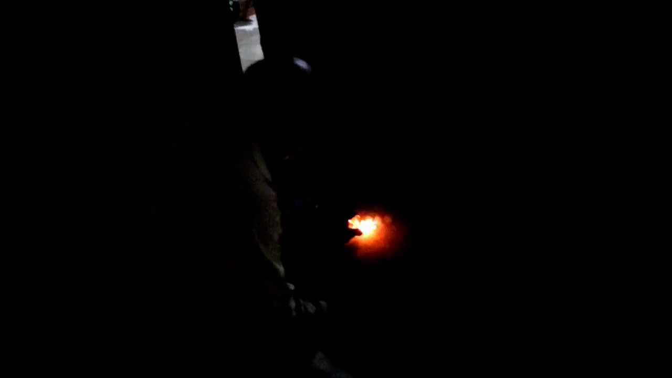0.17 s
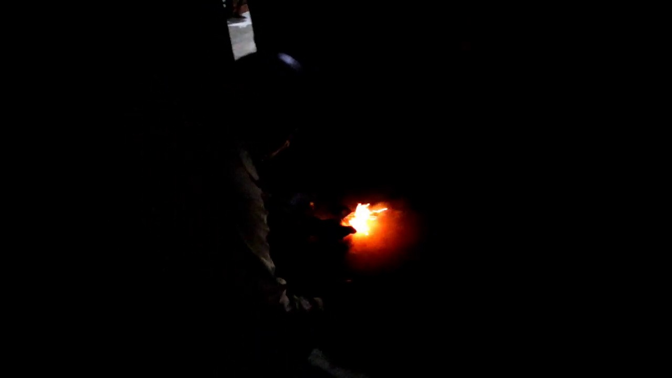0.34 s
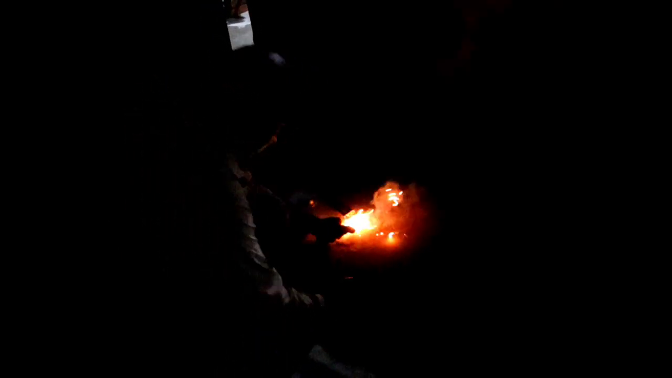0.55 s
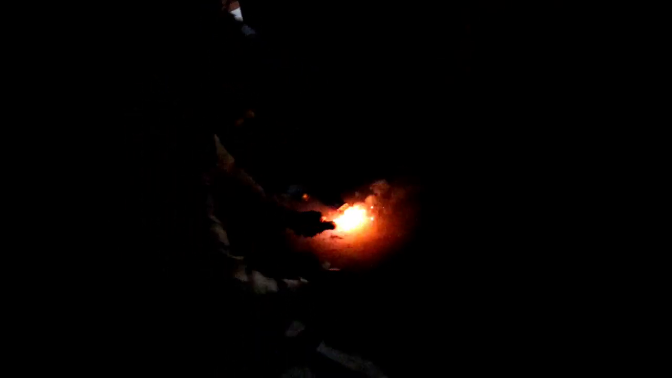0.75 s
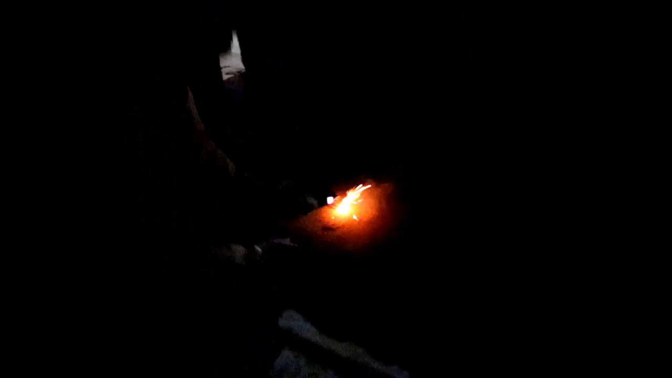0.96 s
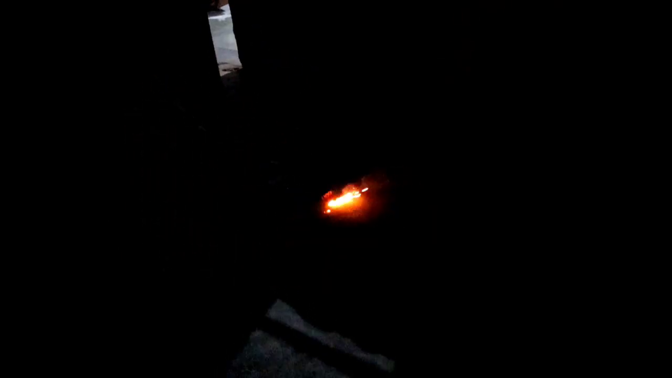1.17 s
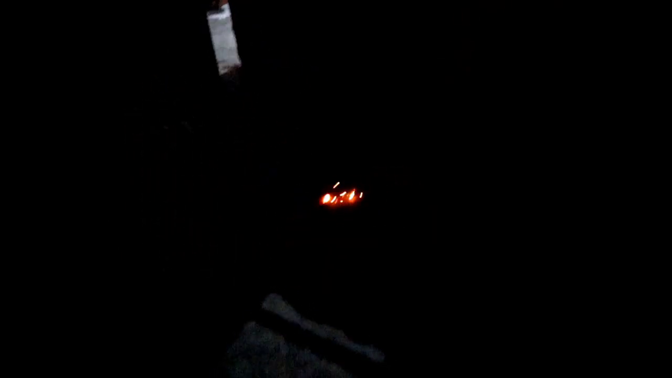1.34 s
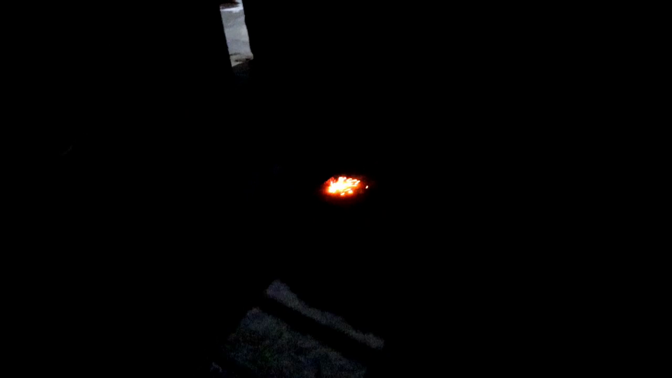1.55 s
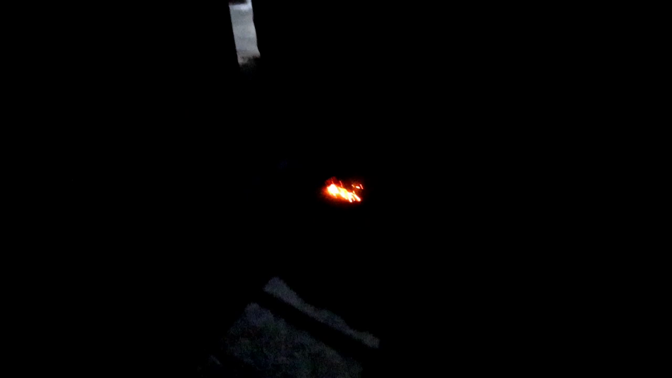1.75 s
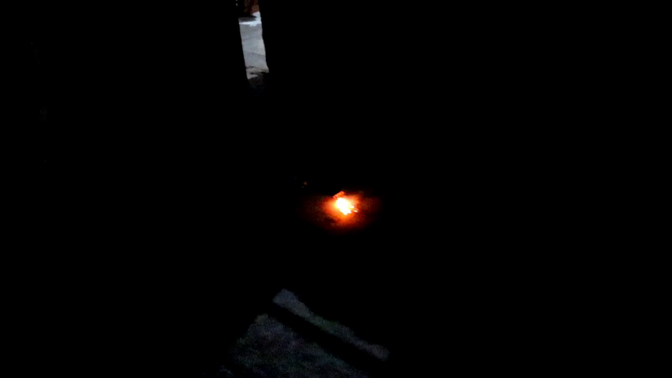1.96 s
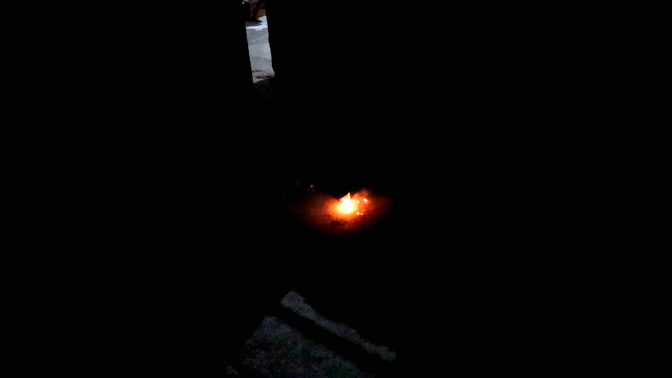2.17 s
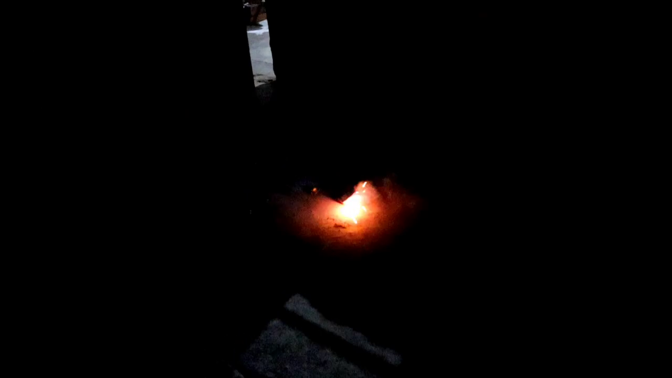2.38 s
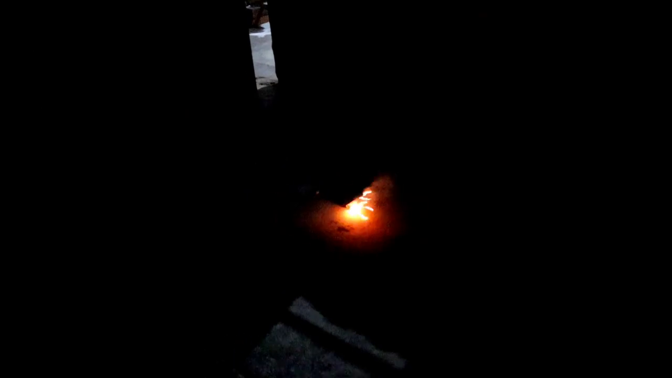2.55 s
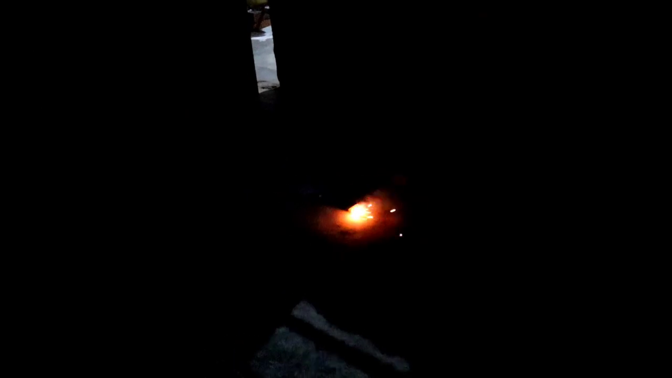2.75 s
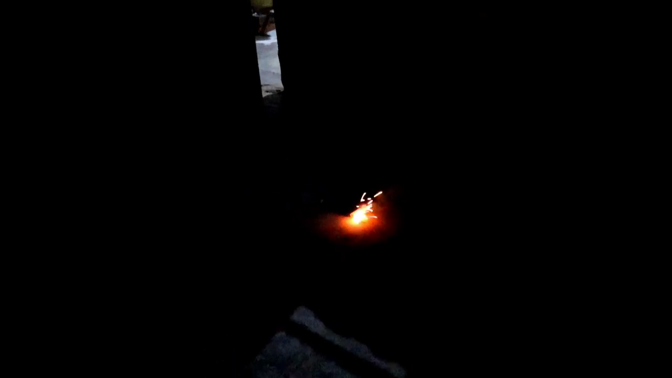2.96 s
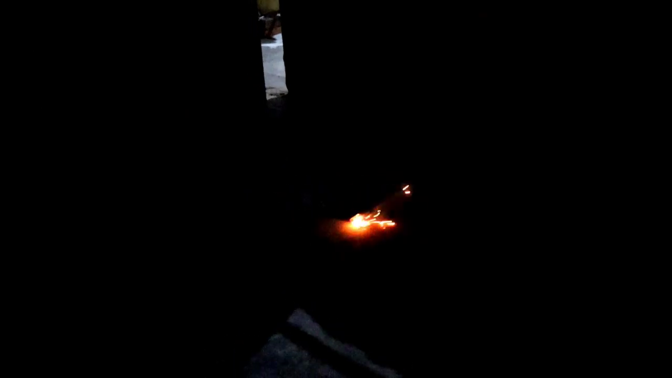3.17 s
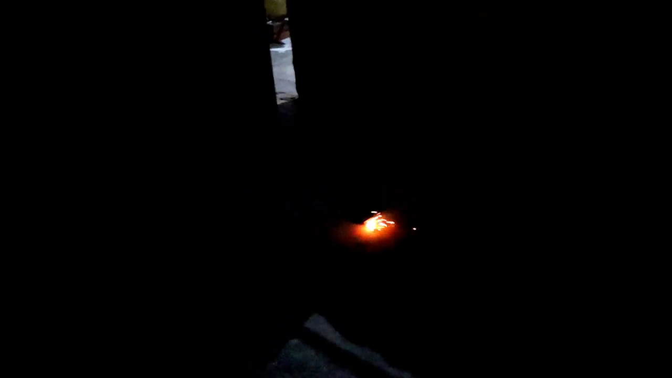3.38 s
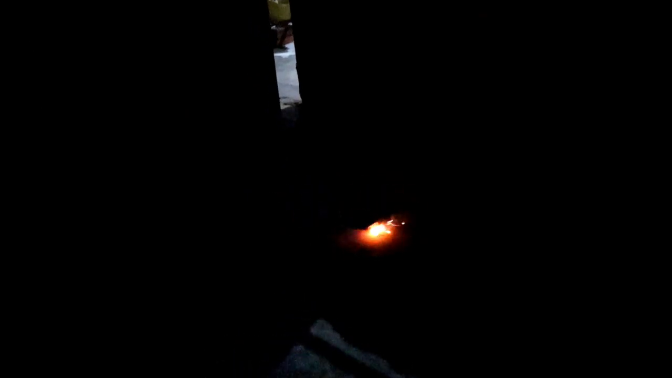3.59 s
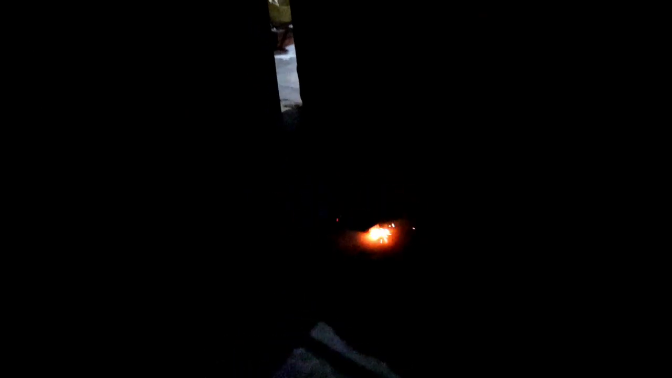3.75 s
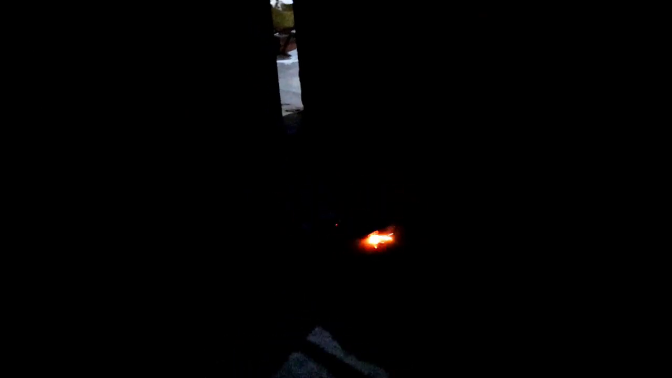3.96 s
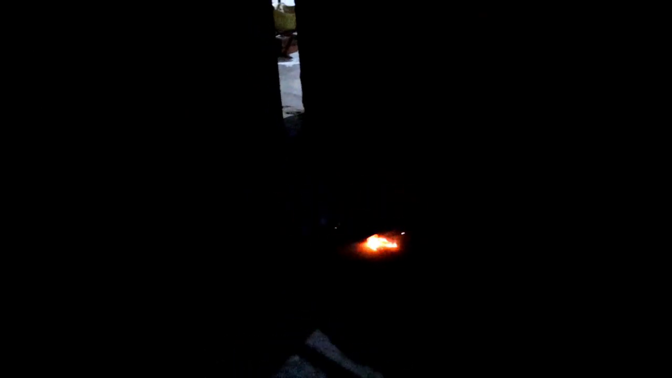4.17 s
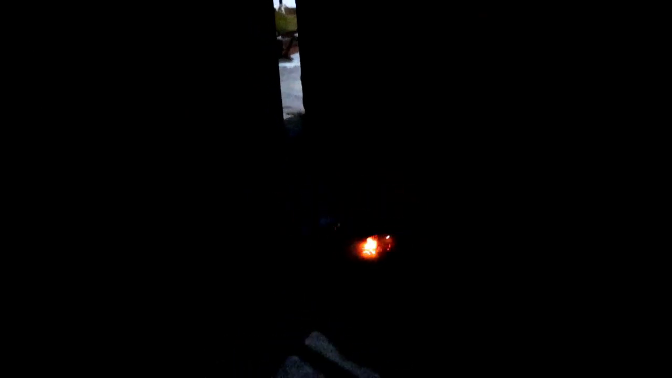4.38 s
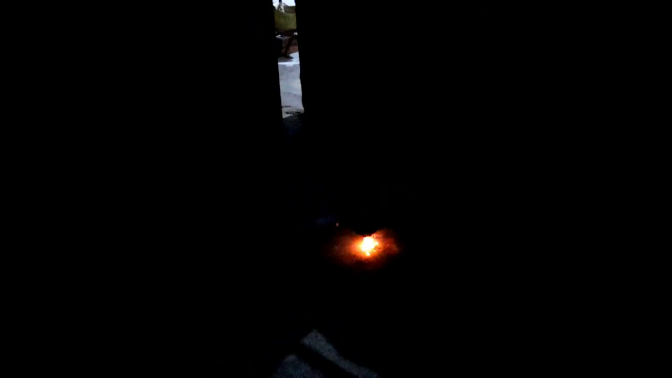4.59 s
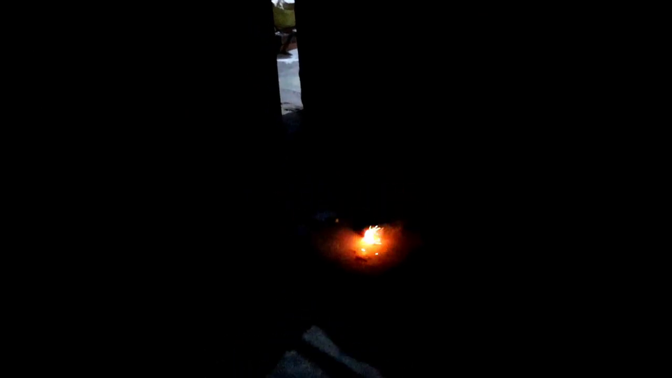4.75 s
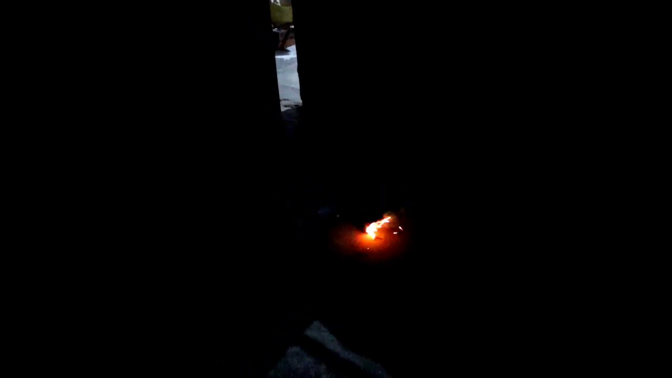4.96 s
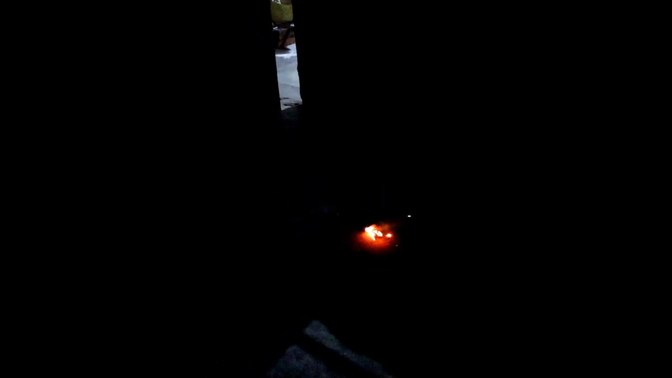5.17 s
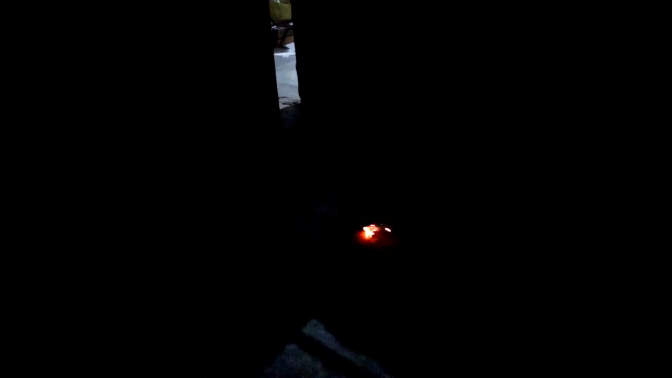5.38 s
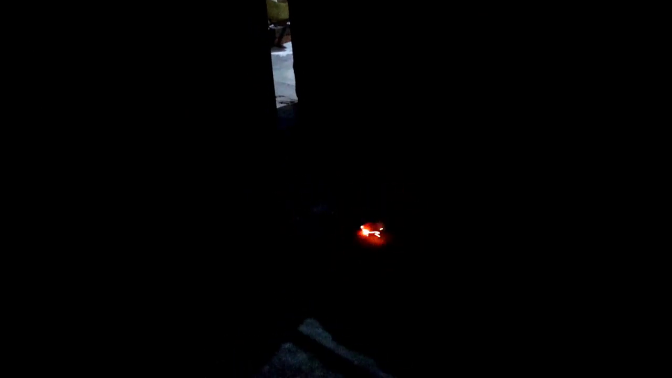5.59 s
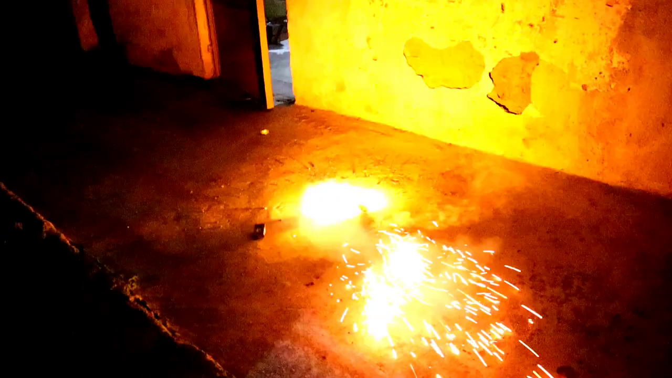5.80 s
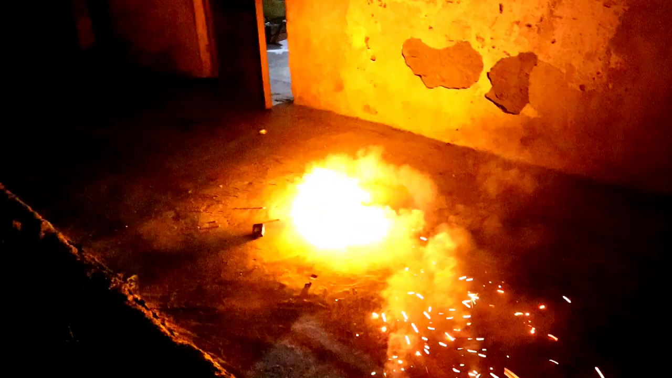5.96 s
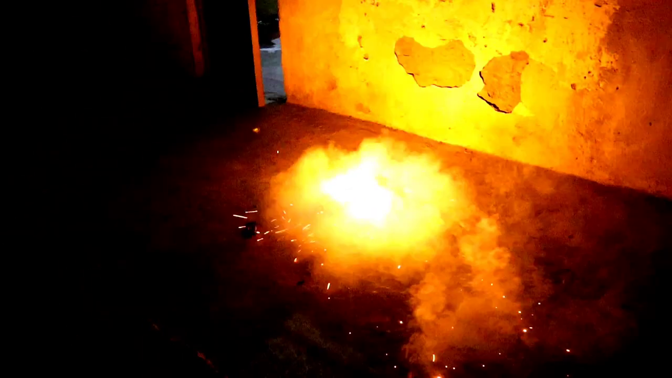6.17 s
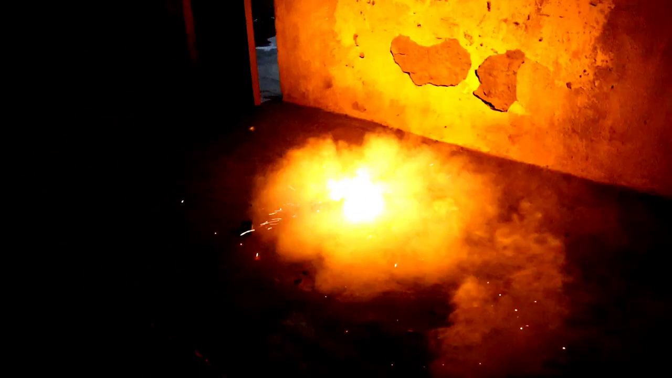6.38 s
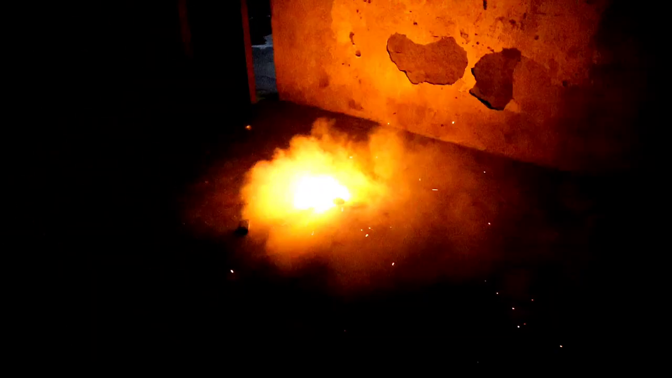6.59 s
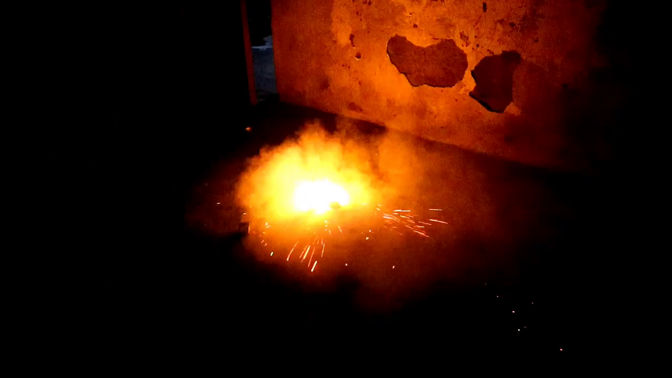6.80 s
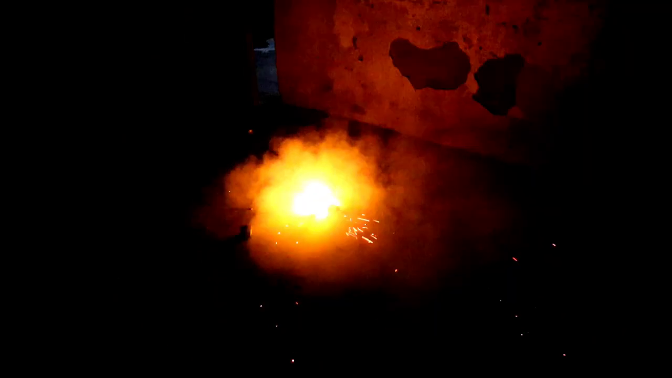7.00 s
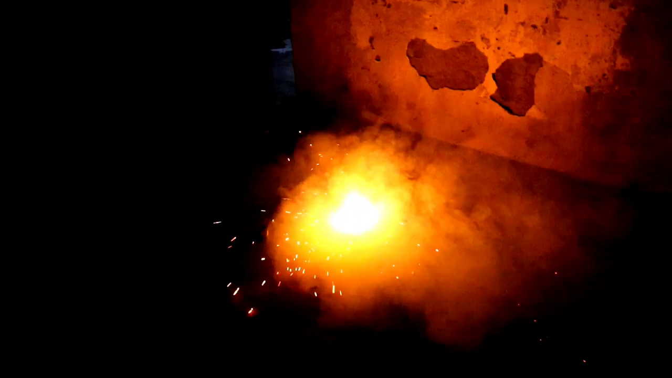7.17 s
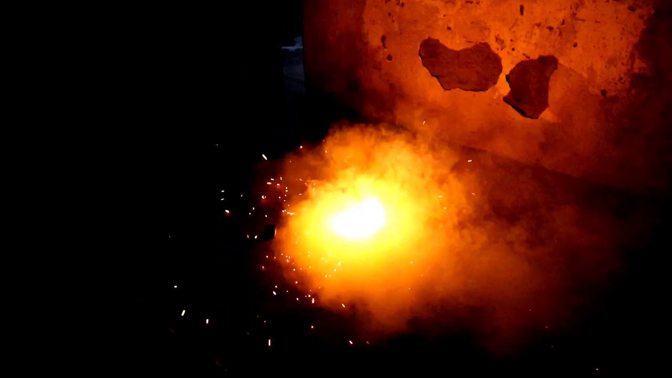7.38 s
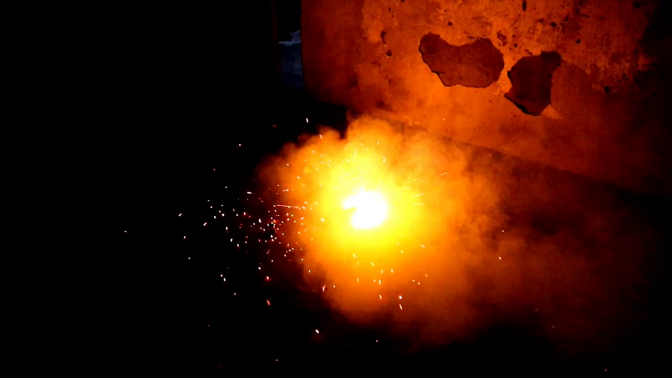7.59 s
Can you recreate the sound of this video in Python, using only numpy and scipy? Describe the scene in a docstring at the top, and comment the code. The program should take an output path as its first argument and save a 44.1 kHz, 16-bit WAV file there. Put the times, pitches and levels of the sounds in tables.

```python
"""A walled yard at night: crickets trill, feet knock and scuff away over concrete, a soft hiss fades.
A ground wheel, a firework tube that spins on the ground, catches with a pop. It whistles over
the roar of its jet, and the pitch sinks as the tube burns empty. The microphone's gain control
turns everything down at once and buries the crickets."""
import sys
import numpy as np
from scipy import signal
from scipy.fft import rfft, irfft, next_fast_len
from scipy.io import wavfile
from scipy.ndimage import map_coordinates

SR = 44100
rng = np.random.default_rng(int(sys.argv[2]) if len(sys.argv) > 2 else 0)


def unload_wav(signal):
    """Save mono or channel-first audio to the path in sys.argv[1] as 16-bit WAV at rate SR, clipped to [-1, 1]."""
    wavfile.write(
        sys.argv[1],
        SR,
        np.round(np.clip(np.atleast_2d(signal).T, -1, 1) * 32767).astype(np.int16),
    )


N = 336904
TIME = np.arange(N) / SR

# The puffs that light the wheel. Each row: start in seconds, level in dB, seconds to fade by 60 dB.
PUFFS = [(5.7748, -6.5, 0.092), (5.777, -10.5, 0.095), (5.795, -18, 0.025)]
IGNITION_S = PUFFS[0][0]
# How alike left and right are. Each row: frequency in Hz, likeness (1 the same, -1 opposite).
LIKENESS = [(30, 1), (100, 0.893), (200, 0.57), (400, 0.0095), (1200, 0.175), (4000, -0.562),
            (10000, -0.652)]


def wheel():
    """A whistling, roaring tube swings round, so its pitch and level sway, more as it speeds up."""
    # The whistle sinks as the tube empties. Each row: time in seconds, pitch in Hz.
    whistle_pitch = [(5.83, 3570), (5.97, 3441), (6.09, 3400), (6.2, 3286), (6.4, 3176), (6.66, 3071),
                     (7.05, 2915), (7.4, 2722), (7.64, 2630)]
    # Each row: time in seconds, whistle level in dB.
    whistle_level = [(5.775, -11), (5.786, 15), (5.8, 19), (5.83, 6.5), (5.87, 15), (6.6, 20), (7.4, 10.5),
                     (7.64, 10.5)]
    # Each row: multiple of the pitch, level in dB against the main tone.
    overtones = [(2, -23), (3, -31), (4, -50)]
    # Each row: time in seconds, turns a second.
    spin_speed = [(5.77, 9), (6.4, 13), (6.7, 14.7), (6.9, 17.5), (7.05, 20), (7.64, 24)]
    # The jet's roar. Each row: frequency in Hz, level in dB.
    jet_spectrum = [(25, -10), (150, -12.5), (300, -5), (480, -11.5), (800, -1), (1100, -7), (2300, 4.5),
                    (4000, -0.5), (5200, -7), (9000, -14.5), (13500, -13)]
    cold_flat_hz, warm_up_s = 400, .048
    radius_m, sound_m_per_s = .022, 343
    facing_s, swing_db = 6.668, 7.5  # when the mouth faces us; level sway at full speed
    burn_s = since(IGNITION_S)
    cold = np.clip(1 - burn_s / warm_up_s, 0, 1)
    lit = np.clip((TIME - PUFFS[-1][0]) / 0.013, 0, 1)
    pitch_hz = over_time(whistle_pitch) - cold_flat_hz * cold
    level_db = over_time(whistle_level) - 25 * bump(5.791, half_s=.0025)  # it chokes once
    spin = over_time(spin_speed)
    angle = 2 * np.pi * np.cumsum(spin) / SR
    angle -= angle[round(facing_s * SR)]
    doppler = -2 * np.pi * spin * radius_m / sound_m_per_s * np.sin(angle)  # higher as the mouth nears
    waver = .0022 * wobble(40) * spin / 15 + .0055 * wobble(400)  # uneven burning roughens the tone
    phase = 2 * np.pi * np.cumsum(pitch_hz * (1 + doppler + waver)) / SR
    upper_tones = sum(amp(db + 0.56 * wobble(30)) * np.sin(k * phase) for k, db in overtones)
    tone = np.sin(phase) + lit * upper_tones
    tone *= np.sqrt(2) * amp(level_db + 2.03 * wobble(25)) * (burn_s > 0)
    beam = np.cos(angle) * spin / spin_speed[-1][1]  # the mouth beams its sound forward
    direct = amp(-5.5 + swing_db * beam) * tone
    echo = amp(-3) * yard_echo(amp(swing_db / 2 * beam) * tone, fade_s=0.223)
    pan_db = -2.5 * burn_s - 16 * cold ** 4  # to the right while cold, then creeping right from centre
    whistle = (direct + echo) * amp([pan_db / 2, -pan_db / 2])
    roar_db = -14 + 3.5 * burn_s + 2.5 * bump(6.07, half_s=.05)  # grows, with one burst of sparks
    roar_level = lit * amp(roar_db + 0.76 * beam + 1.3 * wobble(15))
    roar = roar_level * hiss(jet_spectrum, [(400, 1.0), (1200, 0.766), (4000, 0.38), (10000, 0.12)])
    return whistle + roar + lit * amp(level_db - 35.5 + 5.4 * beam) * sputter()


def sputter():
    """The bright edge of the jet comes in uneven spits."""
    spits = amp(1.8 * wobble(32) + 1.2 * wobble(150))
    return spits * hiss([(3000, -33), (5500, -8.5), (9000, -3.5), (13000, -7.5)], [(4000, .4)])


def pop():
    """The charge catches in a few quick puffs over a short, low thump."""
    # Each row: frequency in Hz, level in dB.
    blast_spectrum = [(20, -60.5), (100, -31), (250, 1), (420, -16), (800, 3), (1150, -7.5), (1600, -1),
                      (3000, -2.5), (6000, -24), (13500, -20)]
    puffs = sum(amp(db - 60 * since(start) / fade_s) * (1 - np.exp(-since(start) / .0012))
                for start, db, fade_s in PUFFS)
    burn_s = since(IGNITION_S)
    thump = amp(-15 - 60 * burn_s / 0.038) * np.sin(2 * np.pi * 250 * burn_s)
    return puffs * hiss(blast_spectrum, [(500, 1.0), (4000, 0.71)]) + thump


def feet():
    """Shoes knock on concrete with a short note and a bright crack, mixed with gritty noise."""
    # Each row: start in seconds, level in dB, pitch in Hz, crack level in dB against the knock.
    steps = [(0.904, -19, 1810, -4.5), (1.521, -13, 214, 1), (1.527, -11, 774, 2), (1.539, -20.5, 276, 1),
             (1.854, -31.5, 1234, 13), (2.106, -25.5, 339.4, 9.5), (2.183, -30, 529, 13.5),
             (2.868, -32.5, 441, 11.5), (2.941, -37.5, 191, -30), (3.716, -25, 1035, 0.5),
             (4.039, -37, 174, -30), (5.07, -30, 253, -13.5)]
    # Gritty noise: short tails of the shoe knocks, and longer scuffs.
    # Each row: start in seconds, length in seconds, level in dB, centre frequency in Hz.
    tails_and_scuffs = [(0.906, 0.0299, -37, 1480), (1.085, 0.1856, -29, 2293),
                        (1.535, 0.0464, -33.5, 2000), (1.8, 0.0935, -39, 261), (1.807, 0.243, -40, 2610),
                        (2.116, 0.1137, -37.5, 2200), (2.878, 0.173, -43, 182.4), (3.08, 0.16, -44.5, 172),
                        (3.095, 0.168, -44, 800), (4.401, 0.127, -43, 190), (5.042, 0.072, -50, 224)]
    shoes, t = np.zeros(N), TIME[:SR // 3]
    for start, db, hz, crack_db in steps:
        crack_s = 0.175 * amp(0.804 * db)  # a harder knock rattles longer
        ring = amp(-60 * t * hz / 8)  # dies away in eight cycles
        knock = np.sin(2 * np.pi * hz * t) * ring * (1 - np.exp(-t / .001))
        burst = rng.standard_normal(len(t)) * amp(-60 * t / crack_s)
        crack = filtered(burst, lambda f: resonance(1500, 3500)(f) ** 2)
        step = knock / abs(knock).max() + amp(crack_db) * crack / abs(crack).max()
        shoes[round(start * SR):][:len(t)] += amp(db - 2.0) * step
    for start, length, db, hz in tails_and_scuffs:
        band = resonance(hz, width_hz=1.45 * hz)
        grit = unit(filtered(rng.standard_normal(len(t)), lambda f: band(f) ** 2 + amp(-2.5) * band(f)))
        swell = abs(np.sin(np.pi * np.clip(t / length, 0, 1))) ** 0.55
        shoes[round(start * SR):][:len(t)] += amp(db) * grit * swell
    echo = spread(yard_echo(shoes, fade_s=0.13), [(100, 1.0), (1000, 0.286), (4000, .1)])
    return shoes + amp(-6.5) * echo


def crickets():
    """Wing strokes ring as a trill: one steady cricket nearby, and a blur of others at their own pace."""
    # The wing's main note. Each row: frequency in Hz, level in dB.
    wing_spectrum = [(2800, -61.5), (3300, -39.5), (3510, -25.5), (3790, -11), (4080, 0), (4240, 1),
                     (4460, -7.5), (4800, -26), (5100, -30.5), (5600, -52.5)]
    # Its raspy overtones. Each row: frequency in Hz, level in dB.
    rasp_spectrum = [(6500, -25.5), (7500, -8.5), (8300, 1), (8900, -9.5), (9400, -8.5), (10000, -7),
                     (11000, -18.5)]
    near = wing_strokes(per_second=96.0, drift=.001, weaker_db=-5)
    far = [sum(wing_strokes(rate, drift=.01, weaker_db=-3) for rate in rng.uniform(80, 110, size=4))
           for side in range(2)]
    clicks = amp(-8.5) * yard_echo(near, fade_s=0.14) + amp(-13) * yard_echo(far, fade_s=0.423)
    clicks += amp(-33.5) * rng.standard_normal((2, N))  # the farthest merge into a hiss
    trill = np.array([coloured(side, wing_spectrum) + amp(-21.5) * coloured(side, rasp_spectrum)
                      for side in clicks])
    level_db = -16 - 10 * np.minimum(since(IGNITION_S) / .07, 1)  # the chorus hushes at the bang
    return amp(level_db + [[.6], [-.6]]) * unit(spread(trill, LIKENESS))  # a little louder on the left


def wing_strokes(per_second, drift, weaker_db):
    """Each wing stroke makes one click; every other stroke is weaker."""
    stroke_count = np.cumsum(per_second * (1 + drift * wobble(3))) / SR + rng.random()
    starts = np.flatnonzero(np.diff(np.floor(stroke_count)))
    clicks = np.zeros(N)
    clicks[starts] = amp(weaker_db * (np.arange(len(starts)) % 2) + rng.normal(0, 2.5, len(starts)))
    return clicks


def soft_hiss():
    """A soft midrange hiss fades as the footsteps move off, and swells just before the charge catches."""
    fading = amp(-40.5 - 15 * since(3.25) + 0.36 * wobble(12))
    swell = amp(-19 - 497.5 * (IGNITION_S - TIME).clip(0)) * (TIME < IGNITION_S)
    return (fading + swell) * hiss([(300, -18.5), (500, -14.5), (900, -14.5), (1300, -16),
                                    (2200, -14.0), (3500, -14.0), (6000, -20)])


def night():
    """A distant rumble lies under the high hiss of the air."""
    # In both, each row: frequency in Hz, level in dB.
    rumble_spectrum = [(15, -10.5), (49, -1), (147, -10.5), (250, -6.5), (480, -16), (800, -10.5),
                       (1080, -16.5), (3200, -11), (6000, -40)]
    air_spectrum = [(3000, -41), (4800, -7), (5500, 7.5), (6500, 8.5), (8000, -4.5), (10500, -3),
                    (12500, 2)]
    rumble = amp(-44 + 0.37 * wobble(4.6)) * hiss(rumble_spectrum)
    air = amp(-38.5 + 0.91 * wobble(6)) * hiss(air_spectrum)
    return rumble + air


def yard_echo(x, fade_s):
    """The walls answer with a dense echo, one for each side, that falls 60 dB in fade_s."""
    t = TIME[:SR // 3]
    tail = rng.standard_normal((2, len(t))) * amp(-60 * t / fade_s) * (t > .004)
    return signal.fftconvolve(np.atleast_2d(x), tail / np.linalg.norm(tail[0]), axes=1)[:, :N]


def hiss(spectrum, likeness=LIKENESS):
    """Stereo noise shaped by (Hz, dB) points and (Hz, left-right likeness) points."""
    return coloured(spread(rng.standard_normal((2, N)), likeness), spectrum)


def spread(pair, likeness):
    """Mix two unrelated signals into left and right, as alike as the table says."""
    def weights(hz):
        turn = np.arccos(np.clip(over_frequency(likeness, hz), -1, 1)) / 2
        return np.array([np.cos(turn), np.sin(turn)])
    mid, side = filtered(pair, weights)
    return np.array([mid + side, mid - side])


def coloured(x, spectrum):
    """Shape a sound by (Hz, dB) points and give it an average power of 1."""
    return unit(filtered(x, lambda hz: amp(over_frequency(spectrum, hz))))


def filtered(x, response):
    """Multiply each frequency in a sound by response(hz)."""
    size = next_fast_len(x.shape[-1] + 8192)
    return irfft(rfft(x, size) * response(np.fft.rfftfreq(size, 1 / SR)), size)[..., :x.shape[-1]]


def resonance(centre_hz, width_hz):
    """A response that lets one band of frequencies through."""
    return lambda f: 1j * f * width_hz / (centre_hz ** 2 - f * f + 1j * f * width_hz)


def over_frequency(points, hz):
    """Join (Hz, value) points on a log frequency scale."""
    freqs, values = np.transpose(points)
    return np.interp(np.log(hz + 1), np.log(freqs + 1), values)


def over_time(points):
    """Join (seconds, value) points with straight lines."""
    return np.interp(TIME, *np.transpose(points))


def wobble(rate):
    """A smooth curve through `rate` random points a second."""
    return map_coordinates(rng.standard_normal(int(N * rate / SR) + 4), [TIME * rate])


def since(start):
    """Seconds after a moment, 0 before it."""
    return np.maximum(TIME - start, 0)


def bump(at_s, half_s):
    """A smooth peak of height 1."""
    return np.exp(-((TIME - at_s) / half_s) ** 2)


def amp(db):
    """Turn decibels into a multiplier."""
    return 10 ** (np.asarray(db) / 20)


def unit(x):
    """Scale a sound to an average power of 1."""
    return x / np.sqrt(np.mean(x ** 2) + 1e-20)


def scene():
    """Everything that sounds in the yard, in stereo."""
    return crickets() + soft_hiss() + night() + feet() + wheel() + pop()


def record(dry):
    """Gain control drops quickly at a loud sound and stays down; peaks that slip through clip softly."""
    # The microphone's treble falls away. Each row: frequency in Hz, gain in dB.
    treble_loss = [(10500, 0), (11300, -2.5), (12800, -6.5), (13600, -21)]
    limit_db, top_hz = -11.5, 13600
    loudness = np.sqrt(signal.lfilter([.001], [1, .001 - 1], np.mean(dry ** 2, 0)))
    loudest_so_far = np.maximum.accumulate(loudness + 1e-9)
    turned_down = dry * np.minimum(1, amp(limit_db) / loudest_so_far)
    clipped = turned_down / (1 + abs(turned_down) ** 6) ** (1 / 6)
    return filtered(clipped, lambda hz: amp(over_frequency(treble_loss, hz)) * (hz < top_hz))


dry = scene()
out = record(dry)
unload_wav(out)
```